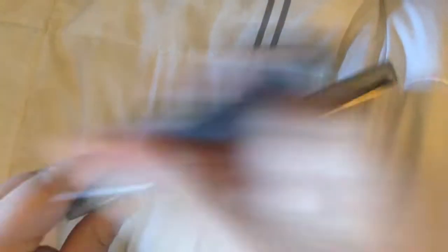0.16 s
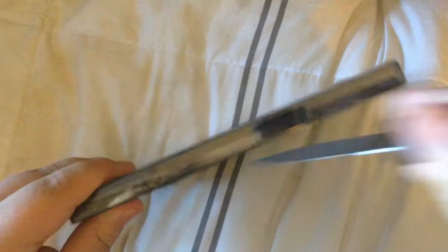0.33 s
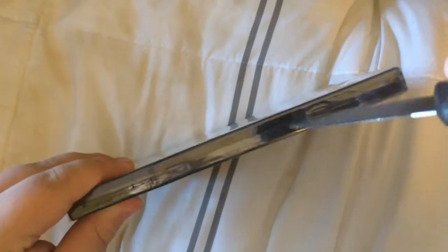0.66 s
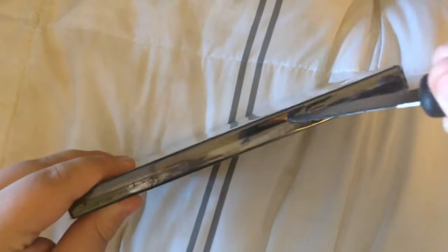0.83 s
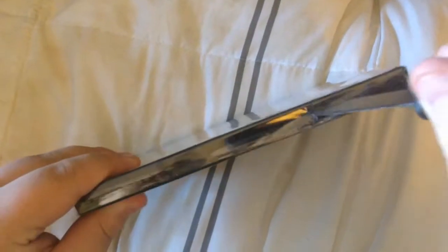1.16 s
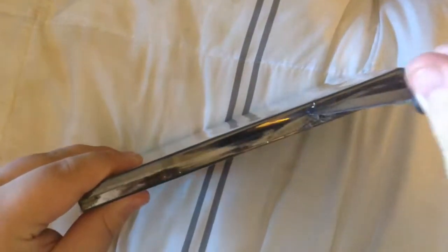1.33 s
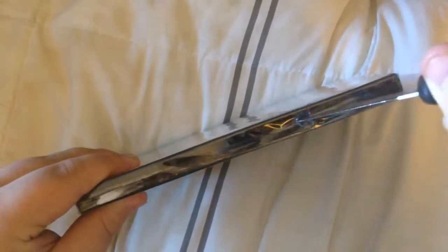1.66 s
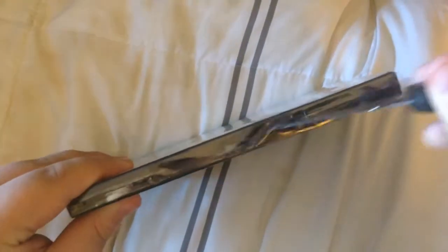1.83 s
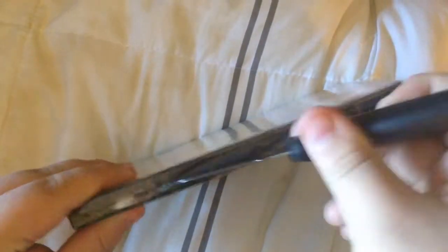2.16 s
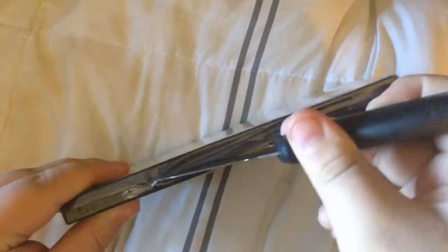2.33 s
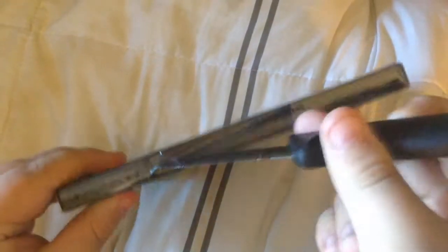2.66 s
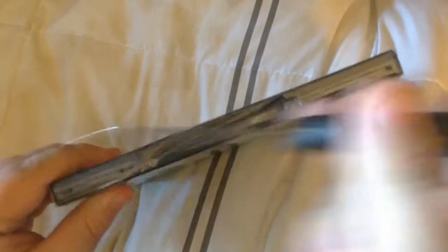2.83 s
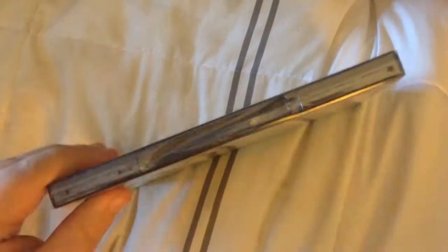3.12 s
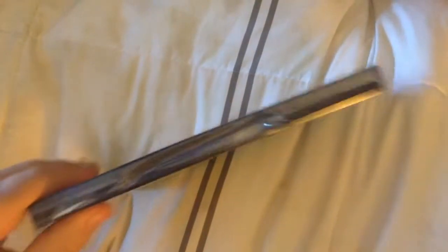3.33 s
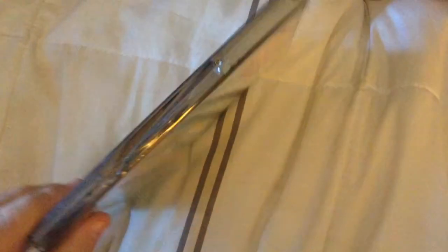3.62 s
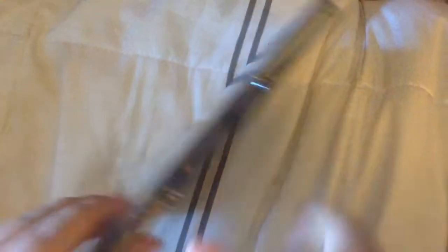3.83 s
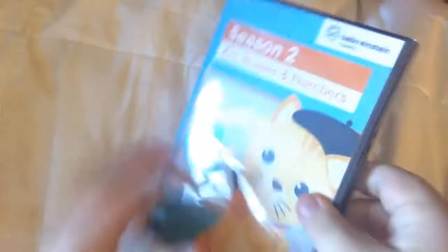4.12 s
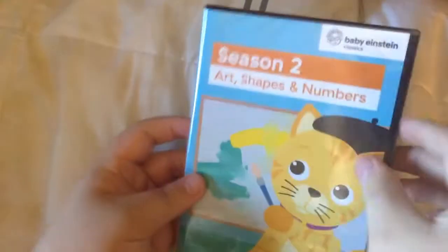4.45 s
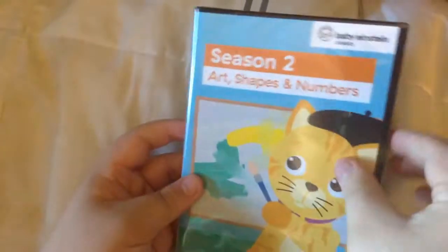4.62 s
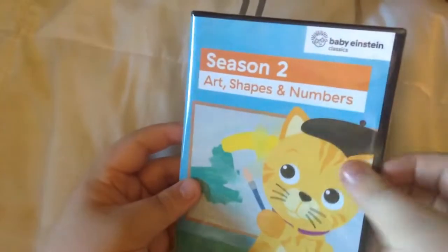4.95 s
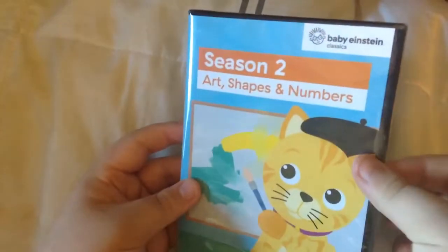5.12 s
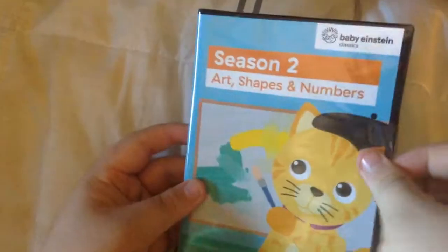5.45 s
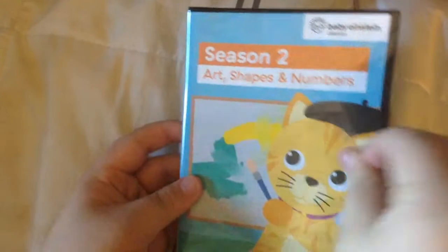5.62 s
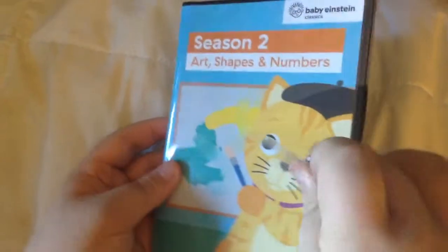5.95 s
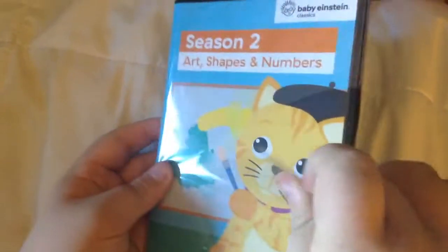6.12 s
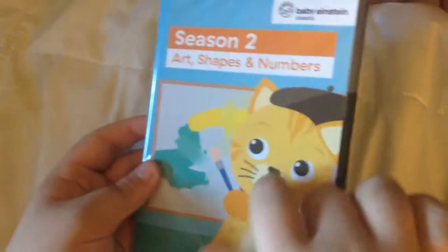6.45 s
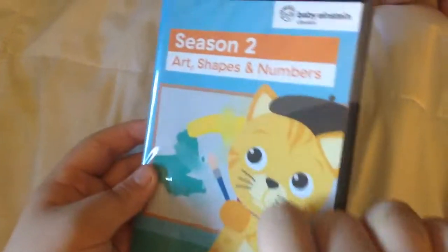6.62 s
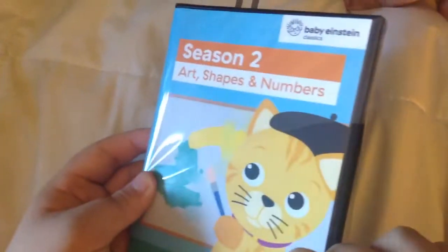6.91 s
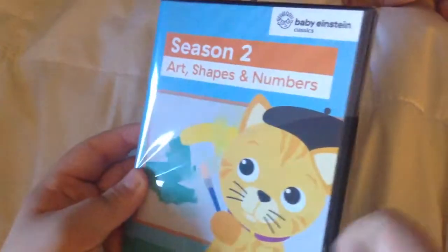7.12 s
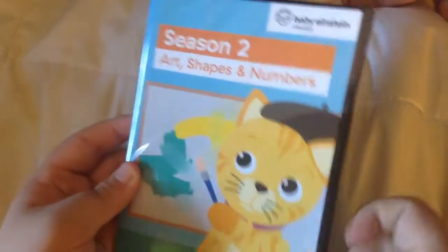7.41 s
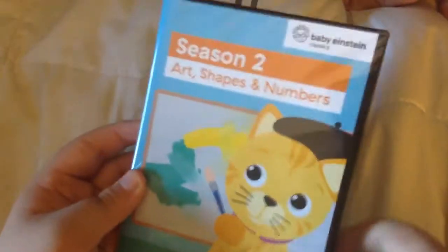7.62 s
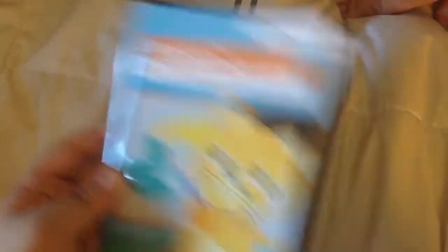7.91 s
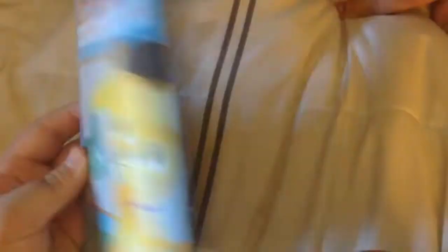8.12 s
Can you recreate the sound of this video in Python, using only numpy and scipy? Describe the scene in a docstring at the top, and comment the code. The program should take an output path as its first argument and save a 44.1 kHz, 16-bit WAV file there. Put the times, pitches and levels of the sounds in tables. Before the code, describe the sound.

For the first second and a half, a blade picks at the shrink wrap on a hollow plastic case with faint, dry ticks. A solid knock comes at about 1.6 seconds, followed by a cluster of bright snaps and crackles as the taut film is slit, strongest near 2 seconds. Another sharp snap stands alone at 2.7 seconds. Soft rustling follows, with light bumps and crinkles around 4 seconds as the case is turned. Fingers pick at the film, giving sharp clicks at about 5 and 5.4 seconds and a short crinkly pull around 6.4. From 7 seconds to the end, just past 8, the wrap peels off in dense, loud crackling with tiny twangs and a very sharp crack at 7.8. The sound is close, crisp and light in bass, in a small soft room with a faint fan-like hiss.

```python
"""A blade picks at the shrink wrap of a hollow plastic case held over a bed, then slits it in sharp snaps.
Each snap rings the case walls and spits treble; taut patches twang, creases crackle, a few knocks thud.
At about 4 s the case turns from edge-on to face-on. Fingers then peel the film off, busiest from 7 s on.
It all plays close to a small microphone, with a small soft room and a fan-like hiss behind."""
import sys
import numpy as np
from scipy import signal
from scipy.fft import rfft, irfft
from scipy.io import wavfile
from scipy.ndimage import uniform_filter1d

SR = 44100
rng = np.random.default_rng(int(sys.argv[2]) if len(sys.argv) > 2 else 0)


def materialize(psi):
    """Save the field psi as 16-bit PCM at rate SR to the path in sys.argv[1].

    A 1-D psi becomes a single channel; in a 2-D psi each row is a channel.
    """
    bounded = np.clip(np.atleast_2d(psi).T, -1, 1)
    quanta = np.round(bounded * 32767).astype(np.int16)
    wavfile.write(sys.argv[1], SR, quanta)


N = 365148

# snaps of film and blade: t/s, case ring peak/dB, film treble/dB re ring, case belly/dB re ring
SNAPS = [(0.1479, -35, -9, -8.5), (0.466, -39.5, -1, -9), (0.49, -34.5, 1, 1.5), (0.612, -41, -5, 1),
         (0.63, -47, -6, 6), (0.814, -34.5, 4, -12), (1.018, -37, 1, -8), (1.194, -38.5, 13, -7),
         (1.2118, -40.5, -2, -8), (1.265, -45.5, -9, 3), (1.325, -40, 9.5, -7), (1.373, -44, -7, -2),
         (1.4185, -37.5, 9, -11), (1.4378, -43, -8, -8), (1.448, -43.5, 17, -15), (1.5239, -35.5, -15, -24),
         (1.567, -38, -9, -12), (1.5883, -16, 5.5, -4), (1.6802, -34.5, -7, -11), (1.7575, -18, 12, -14.5),
         (1.772, -27, 6, -10), (1.779, -39, 21, -4), (1.8265, -27.5, 8, -14), (1.836, -31, 13.5, -2.5),
         (1.841, -33, 14, -13), (1.847, -35, 6, 0), (1.8526, -38.5, 18.5, -20), (1.895, -46, 7, -17),
         (1.9065, -27, 13.5, -17), (1.9116, -30, 19, -18), (1.9184, -34.5, 18, -10),
         (1.9509, -12.5, 8, -25), (1.9979, -29, 2, -29), (2.0432, -8, 7.5, -14.5), (2.162, -35, 11, -29),
         (2.1789, -16, 3.5, -11.5), (2.1832, -20, 3, -11.5), (2.1927, -32.5, 20.5, -12),
         (2.305, -46, 5, -13), (2.4407, -32.5, 6, -2), (2.7115, -7, 1, -17), (2.976, -37, -0.5, -11.5),
         (2.9972, -40.5, 5, -8), (3.8285, -35, -8.5, -16), (4.0016, -23.5, -2, -10),
         (4.0108, -29.5, -3, -7), (4.0475, -40.5, 9, -5), (4.3598, -33.5, 4, -2.5), (4.3999, -36.5, 3, 1),
         (4.593, -37, 8, -8), (4.6782, -44, 12.5, 4.5), (4.909, -33, 3, -20), (4.932, -44, 5, -4),
         (4.9511, -25, 3.5, -12), (4.993, -34.5, 10, -22), (5.0179, -10.5, -7, -19),
         (5.029, -20, -0.5, -20), (5.086, -33, 3.5, -16), (5.101, -40.5, 9, -10), (5.175, -29, 8.5, -6),
         (5.205, -53, 15.5, 1), (5.22, -50.5, 7.5, -6), (5.3523, -46, 9, 1), (5.36, -5, -10, -16),
         (5.375, -33, -12, -2), (5.4362, -43.5, 14, -1), (5.461, -22, -0.5, -16), (5.4906, -25, 7, -9.5),
         (5.497, -37, 10, -18), (5.5116, -39, 9, -23), (5.545, -33, -5, -11.5), (5.57, -43, 20.5, -21),
         (5.587, -45.5, 16, -7), (5.7666, -40, 12.5, -24), (5.791, -34, 9, -8), (5.8, -42.5, 14, -22),
         (5.8961, -39, 15, -10), (6.029, -38.5, 3.5, -9), (6.06, -37, -6, -11), (6.1966, -38, 6, -6),
         (6.2412, -29, -7.5, -14), (6.3154, -19, 8.5, -8.5), (6.34, -25, 5, -19), (6.3586, -31, 4, -15),
         (6.4105, -29, 4, -15), (6.4191, -28.5, 5.5, -8), (6.4479, -26, 4.5, -12), (6.4532, -34, 4, -15),
         (6.4646, -23, -22, -16), (6.475, -23, -7, -17), (6.5156, -25.5, -8, -7), (6.549, -44, 13.5, -13),
         (6.6017, -25, -12, -12), (6.635, -34.5, -9, -4.5), (6.7456, -51.5, 27.5, -18),
         (6.8306, -35.5, 7.5, -12), (6.8446, -23, -21, -33), (6.891, -32.5, -17, -10),
         (6.948, -33, 3.5, -4), (6.9696, -32.5, -8, -5.5), (6.999, -44, -9, -26), (7.0165, -38, 18.5, -21),
         (7.0746, -30.5, 5, -3), (7.0979, -10, 0.5, -43), (7.1045, -16.5, -8, -9.5),
         (7.124, -5.5, -7.5, -35), (7.131, -25, -3, -16), (7.1508, -23, 5, -23), (7.18, -23.5, 3.5, -34),
         (7.2, -35, -5, -19), (7.214, -35, 1, -15), (7.2337, -15, -3, -30), (7.243, -17.5, -4, -13),
         (7.2466, -23.5, 0, -4), (7.2738, -31, 12, -23), (7.2876, -18, -2.5, -30), (7.346, -32, 2, -10),
         (7.354, -35, 7, -3), (7.3688, -30, 0, -11), (7.4166, -24.5, 6.5, -6.5), (7.4288, -18.5, -5, -8.5),
         (7.4502, -13, -8.5, -20), (7.4761, -14.5, 0, -10), (7.5234, -26.5, -13, -14),
         (7.565, -23, -12, -35), (7.5766, -17.5, -2, -19), (7.5982, -16, -2, -18),
         (7.6065, -16.5, -2.5, -9), (7.6202, -14.5, -8, -15), (7.6318, -12, -11, -35),
         (7.642, -12, -11, -9), (7.7045, -14, -0.5, -3), (7.7334, -22.5, 0, -9), (7.7598, -27.5, 4.5, -32),
         (7.8139, -23, 7.5, -5), (7.823, 1, -7.5, -17.5), (7.861, -21, 4.5, -11), (7.8803, -12.5, -11, -7),
         (7.885, -14, -19, -0.5), (7.897, -28, -3, -11), (7.9076, -18, -11, -28), (7.9318, -20, 5.5, -32),
         (7.946, -28.5, 6.5, -15), (7.9648, -14, -3, -18), (8.0496, -27.5, 1.5, -27),
         (8.0813, -19, 2.5, -14.5), (8.0955, -18, -7, -31), (8.113, -23.5, -10, -15), (8.141, -31, 4, -10),
         (8.161, -20.5, 6, -11.5), (8.1766, -21.5, -3, -17), (8.2085, -18, -9, -15), (8.2304, -19, 4, -17),
         (8.266, -24.5, 0.5, -11)]
# hollow low resonances of the case: f/Hz, width/Hz, edge-on gain/dB, face-on gain/dB
BELLY_MODES = [(583, 170, -1.5, -2), (700, 225, 4.5, 9), (1086, 1620, -7.5, 5)]
# midrange ring of the case walls: f/Hz, width/Hz, edge-on gain/dB, face-on gain/dB
RING_MODES = [(1504, 113, 15.5, -2.5), (1934, 240, 11.5, 16.5), (2816, 310, -16, -14)]
# treble resonances of the film: f/Hz, width/Hz, edge-on gain/dB, face-on gain/dB
FILM_MODES = [(3374, 1560, -11, -9), (5490, 2250, -0.5, -0.5), (7970, 6270, -0.5, -1),
              (10290, 2700, -5.5, -2), (12440, 1200, -18, -8.5), (14380, 1700, -24.5, -17.5)]


def snaps(slip_ms=0.55, slip_scatter=0.63, detune=0.02):
    """The film lets go in a short ragged slip that excites the case and the film itself."""
    out, t = np.zeros(N), np.arange(2048) / SR
    for start, db, film_db, belly_db in SNAPS:
        length_ms = max(slip_ms * np.exp(slip_scatter * rng.standard_normal()), .1)
        age = t * 1000 / length_ms
        grit = rng.standard_normal(len(t))
        slip = grit * (age * np.exp(-age) + 0.31 * np.exp(-age / 7))
        jolt = (0.7 + grit) * age * np.exp(-4 * age)  # the stiff case feels only the first jerk
        colour_db = 3.5 * rng.standard_normal(len(FILM_MODES))
        # each snap grips the case elsewhere, so its ring shifts a little
        tuned = np.array(RING_MODES) * [1 + detune * rng.standard_normal(), 1, 1, 1]
        face = facing(start)
        add(out, start, body(jolt, tuned, face, colour_db[::-1] / 2), db)
        add(out, start, body(slip, FILM_MODES, face, film_colour(start, colour_db)), db + film_db)
        # face-on, the belly swings against the ring and leaves a gap between them
        polarity = -1 if face > .5 else 1
        add(out, start, polarity * body(jolt, BELLY_MODES, face), db + belly_db)
    return out


def twangs(width_hz=350):
    """Taut patches of film and case wall ring briefly at their own pitch as they let go."""
    # taut patches: t/s, peak/dB, f/Hz
    patches = [(1.7582, -18, 6450), (1.9515, -25, 5270), (2.0437, -8.5, 6680), (2.183, -25, 6300),
               (2.7118, -17, 3640), (5.0178, -21.5, 6570), (5.3606, -23.5, 6440), (5.461, -25, 6770),
               (6.3158, -14, 1420), (7.1048, -18, 1000), (7.1318, -25, 3300), (7.2341, -15, 2920),
               (7.2342, -11, 840), (7.2477, -19, 2600), (7.2882, -23, 3700), (7.4765, -28, 3440),
               (7.8232, -22, 2850), (7.8235, -24.5, 690), (7.8835, -18, 2700)]
    out, tick = np.zeros(N), signal.unit_impulse(1024)
    for start, db, hz in patches:
        add(out, start, ring(ring(tick, hz, width_hz), hz, 2 * width_hz), db)
    return out


def creases(buckles_per_s=400, spread_db=6, rub_db=0.5):
    """Tiny buckles at random moments, a few much larger than the rest, over the rub of skin on film."""
    t = np.arange(N) / SR
    face = facing(t)
    onsets = rng.random(N) < buckles_per_s / SR
    sizes = undb(spread_db * np.minimum(rng.exponential(size=N), 4))
    decay = np.exp(-np.arange(256) / SR / 0.0014)
    buckles = np.convolve(onsets * sizes, decay)[:N] * rng.standard_normal(N)
    rub = undb(rub_db) * rng.standard_normal(N)
    shake = level(buckles, 0) + rub
    # the colour flickers as buckles favour different parts of the treble
    film = body(shake, FILM_MODES, face, film_colour(t, [2.2 * walk(150) for _ in FILM_MODES]))
    walls = body(shake, RING_MODES, face, [lift_db + 5 * walk(90) for lift_db in (0, 0, 9)])
    belly = undb(1.42 * walk(40)) * body(shake, BELLY_MODES, face)
    ring_gain, film_gain, belly_gain = crease_gains(t)
    return ring_gain * level(walls, 0) + film_gain * level(film, 0) + belly_gain * level(belly, 0)


def crease_gains(t, attack_s=0.01, release_s=0.02, settle_db=-28.5, settle_s=0.018):
    """Crackle envelopes for ring, film and belly: pulls swell, hold and let go; each snap settles."""
    # pulls, drags and rubs that crease the film: start/s, end/s, case ring/dB, film/dB, case belly/dB
    pulls = [(0.123, 0.237, -56, -70, -61), (0.482, 0.532, -80, -84, -54), (0.606, 0.605, -60, -76, -47),
             (1.238, 1.372, -57, -65.5, -61), (1.797, 1.868, -42, -44, -48), (1.877, 2.021, -50, -46, -57),
             (2.06, 2.18, -47, -41.5, -44.5), (2.597, 2.71, -57, -61.5, -66),
             (2.91, 2.99, -68.5, -62, -63.5), (3.094, 3.15, -79, -57, -64), (3.16, 3.242, -76, -69.5, -62),
             (3.381, 3.748, -61, -62.5, -67), (3.914, 3.98, -57, -63, -65), (3.992, 4.043, -37, -44, -40),
             (4.197, 4.305, -47.5, -57.5, -54), (4.315, 4.395, -48.5, -46.5, -51),
             (4.417, 4.593, -59, -51, -54.5), (4.726, 4.767, -66.5, -56.5, -58.5),
             (4.857, 5.047, -56.5, -55.5, -58), (5.125, 5.165, -51.5, -51.5, -55),
             (5.427, 5.5, -62, -47.5, -67), (5.611, 5.637, -59, -47, -66), (5.755, 5.806, -74, -52, -66.5),
             (5.904, 6.15, -60.5, -60, -67.5), (6.139, 6.314, -53.5, -54.5, -63.5),
             (6.32, 6.487, -49.5, -45, -55.5), (6.48, 6.802, -59, -60, -62),
             (6.817, 6.867, -53, -49.5, -55), (6.884, 6.984, -53.5, -61.5, -66),
             (6.98, 7.06, -45.5, -50.5, -51.5), (7.058, 7.165, -37, -41.5, -47.5),
             (7.195, 7.197, -32, -46, -56), (7.254, 7.287, -39, -37, -49.5),
             (7.305, 7.413, -49.5, -51, -62), (7.396, 7.485, -38.5, -42.5, -47.5),
             (7.529, 7.627, -40.5, -49, -49.5), (7.623, 7.652, -29.5, -34, -36),
             (7.682, 7.785, -52, -47.5, -57), (7.866, 7.95, -33.5, -35.5, -43),
             (7.939, 7.975, -32.5, -33.5, -36), (8.033, 8.173, -43.5, -48.5, -56),
             (8.187, 8.242, -41.5, -41, -49)]
    power = undb([[-65], [-73], [-74.5]]) ** 2 * np.ones(N)  # the case merely held
    for start, end, *db in pulls:
        span = slice(int(start * SR), int((end + 10 * release_s) * SR))
        swell = np.clip((t[span] - start) / attack_s, 0, 1)
        release = np.exp(-np.maximum(t[span] - end, 0) / release_s)
        power[:, span] += (undb(db)[:, None] * swell * release) ** 2
    kicks = np.zeros_like(power)
    for start, db, film_db, belly_db in SNAPS:
        kicks[:, int(start * SR)] = undb(settle_db + db + np.array([0, film_db, belly_db])) ** 2
    settling = signal.lfilter([1], [1, -np.exp(-2 / settle_s / SR)], kicks)
    return np.sqrt(power + settling)


def knocks():
    """A clean blow or a soft scuffing contact; then the whole case swings a cycle or two."""
    # knocks on the case and the bed: t/s, peak/dB, f/Hz, contact/ms, scuff/0-1
    contacts = [(0.627, -41.5, 210, 4.1, 0.2), (0.671, -42.5, 370, 2.6, 1),
                (1.5893, -1.5, 207, 0.028, 0.04), (1.611, -30.5, 210, 5.7, 0.01),
                (2.0431, -28.5, 308, 0.22, 0), (2.7118, -31, 294, 0.27, 0.02),
                (3.409, -32.5, 298, 9.1, 0.75), (3.998, -31, 166.6, 4.2, 0.12),
                (4.029, -36.5, 350, 14, 0.16), (4.299, -35.5, 222, 11.6, 0.05),
                (7.704, -30.5, 320, 2.1, 0.6), (7.823, -43, 250, 0.18, 0.3), (7.883, -42, 227, 1.1, 0.12),
                (7.961, -36, 285, 10, 1)]
    out, t = np.zeros(N), np.arange(4096) / SR
    for start, db, hz, contact_ms, scuff in contacts:
        roughness = 1 - scuff + scuff * 20 * rng.standard_normal(len(t))
        push = t * np.exp(-t * 1000 / max(contact_ms, .05)) * roughness
        swing = ring(push, hz, 1.08 * hz)
        add(out, start, (1 - scuff) * swing + scuff * ring(swing, hz, hz), db)
    return out


def body(x, modes, face, colour_db=None):
    """All resonances of a part as heard from one side; each blow may weight them its own way."""
    colour_db = np.zeros(len(modes)) if colour_db is None else colour_db
    ringing = 0
    for k, (hz, width_hz, edge_db, face_db) in enumerate(modes):
        gain = undb(edge_db + face * (face_db - edge_db) + colour_db[k])
        ringing += (-1) ** k * gain * ring(x, hz, width_hz)
    # a part radiates little outside the span of its modes
    span_hz = [modes[0][0] / 1.3, min(modes[-1][0] * 1.2, SR / 2.2)]
    return signal.lfilter(*signal.butter(2, span_hz, "band", fs=SR), ringing)


def film_colour(t, scatter_db):
    """Weights of the film resonances in dB: scatter on all, plus a slow drift on the lowest."""
    # drift of the lowest film resonance: t/s, level/dB
    drift = [(0, 1), (1.4, -2), (2.3, 3), (2.7, 11), (4.1, -5), (4.6, 0), (5.7, -0.5), (6.1, -0.5),
             (7, 2.5), (8.28, 4.5)]
    return [scatter_db[0] + np.interp(t, *np.transpose(drift)), *scatter_db[1:]]


def facing(t, turn_start_s=4.0, turn_end_s=4.4):
    """The case turns: 0 with its edge towards the microphone, 1 with its face."""
    return np.interp(t, (turn_start_s, turn_end_s), (0, 1))


def room(x, t60_s=0.27, wet_db=-28):
    """Short diffuse tail of a soft-furnished room, mostly treble."""
    t = np.arange(SR // 2) / SR
    decay = np.exp(-np.log(1000) * t / t60_s) * (t > .003)
    tail = ring(rng.standard_normal(len(t)), 6800, 9000) * decay
    return signal.fftconvolve(x, tail * undb(wet_db) / np.sqrt(np.sum(tail ** 2)))[:N]


def room_hiss(rms_db=-59):
    """Fan-like room tone whose level wavers slightly."""
    # spectrum of the hiss: f/Hz, relative level/dB
    spectrum = [(24, -48.5), (40, -22), (106, -19.5), (124, -12), (185, -2.5), (372, -9), (491, -6.5),
                (646, -5.5), (715, -8), (1240, -10.5), (1590, -7), (3560, -21.5), (14100, -24.5),
                (16000, -43.5)]
    hz, db = np.transpose(spectrum)
    bins_hz = np.maximum(np.arange(N // 2 + 1) * SR / N, 1)
    shape = undb(np.interp(np.log(bins_hz), np.log(hz), db))
    hiss = irfft(rfft(rng.standard_normal(N)) * shape, N)
    return level(hiss * undb(walk(8.5)), rms_db)


def ring(x, hz, width_hz):
    """One damped resonance, gain 1 at its centre."""
    return signal.lfilter(*signal.iirpeak(min(hz, SR / 2.2), hz / width_hz, fs=SR), x)


def walk(rate_hz):
    """Glides from one random value to the next; spread near 1."""
    step = int(SR / rate_hz)
    return uniform_filter1d(np.repeat(rng.standard_normal(N // step + 1), step), step)[:N]


def add(out, start_s, sound, peak_db):
    """Mix a short sound in at a time and peak level."""
    i = int(start_s * SR)
    out[i:i + len(sound)] += (sound * undb(peak_db) / np.abs(sound).max())[:N - i]


def level(x, rms_db):
    """Set a signal to an RMS level."""
    return x * undb(rms_db) / np.sqrt(np.mean(x ** 2))


def undb(db):
    """Decibels to amplitude."""
    return 10 ** (np.asarray(db) / 20)


def scene(low_cut_hz=125):
    """Film and case up close, their bass lost in the small microphone, over the room and its hiss."""
    near = snaps() + twangs() + knocks() + creases()
    near = signal.sosfilt(signal.butter(4, low_cut_hz, "high", fs=SR, output="sos"), near)
    return (near + room(near) + room_hiss())[None]


def record(dry):
    """The loudest peaks clip at full scale; the top is cut steeply."""
    top_hz = 15600
    return signal.sosfilt(signal.ellip(8, .2, 70, top_hz, fs=SR, output="sos"), np.clip(dry, -1, 1))


dry = scene()
out = record(dry)
materialize(out)
```